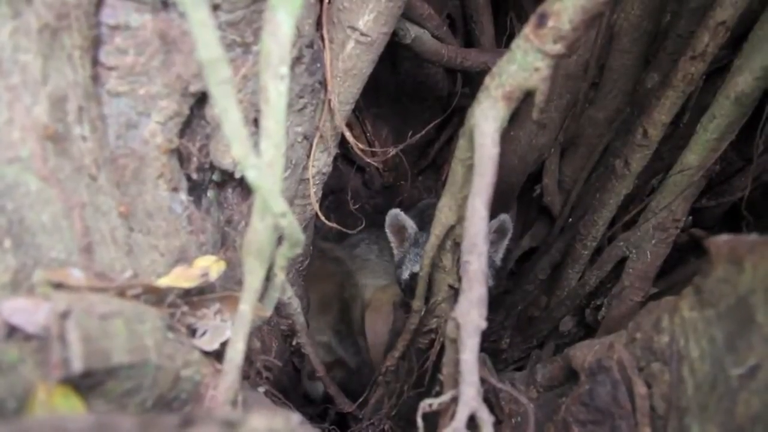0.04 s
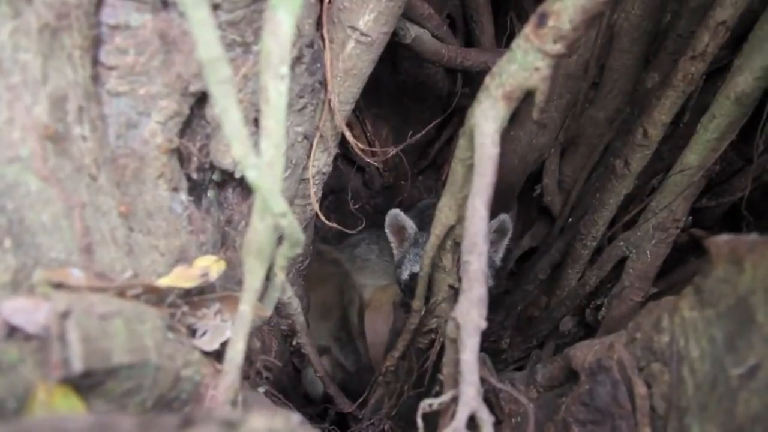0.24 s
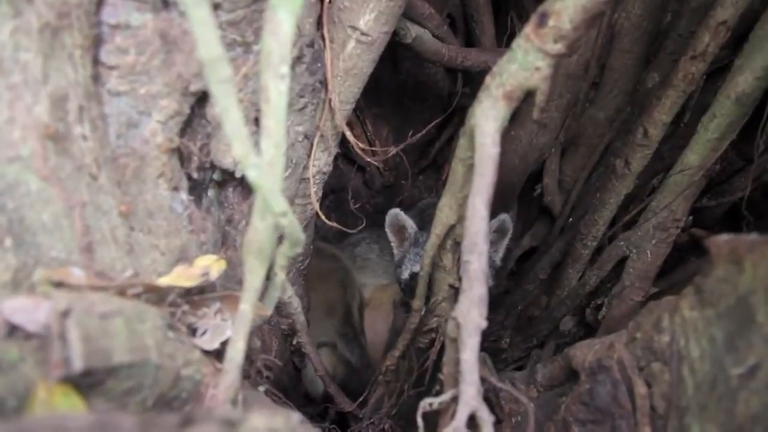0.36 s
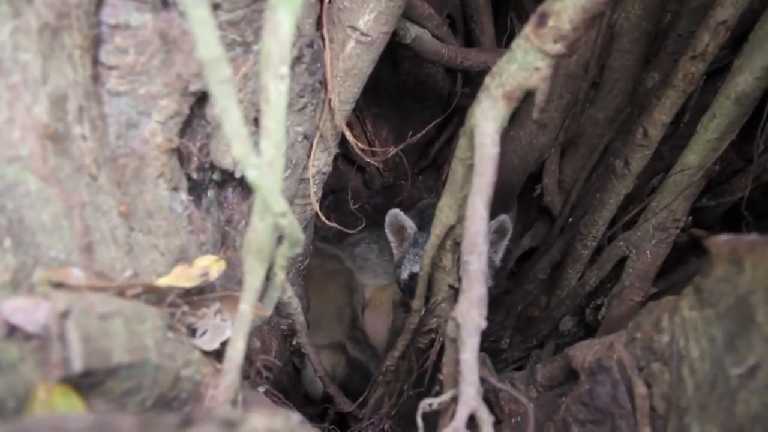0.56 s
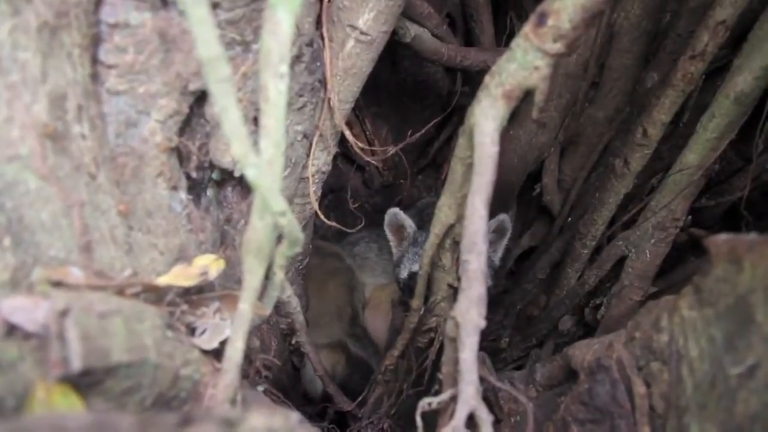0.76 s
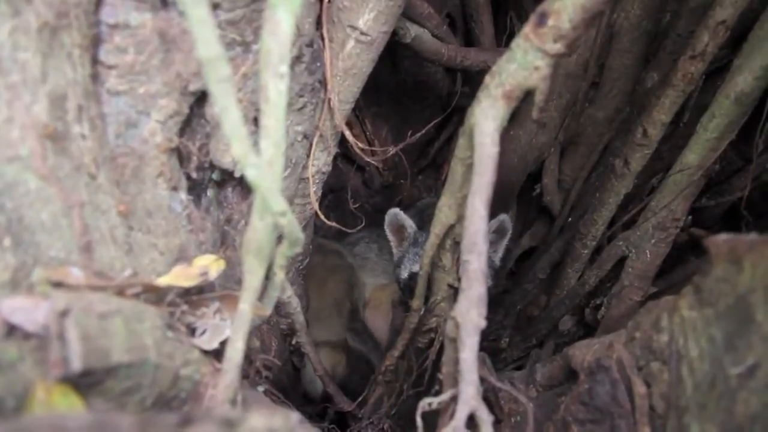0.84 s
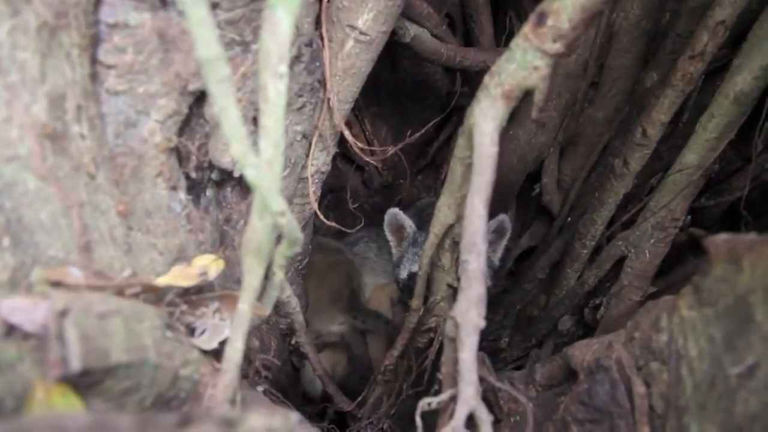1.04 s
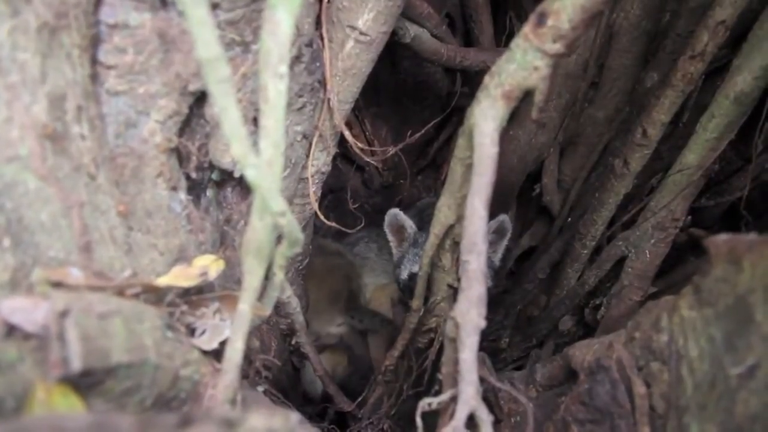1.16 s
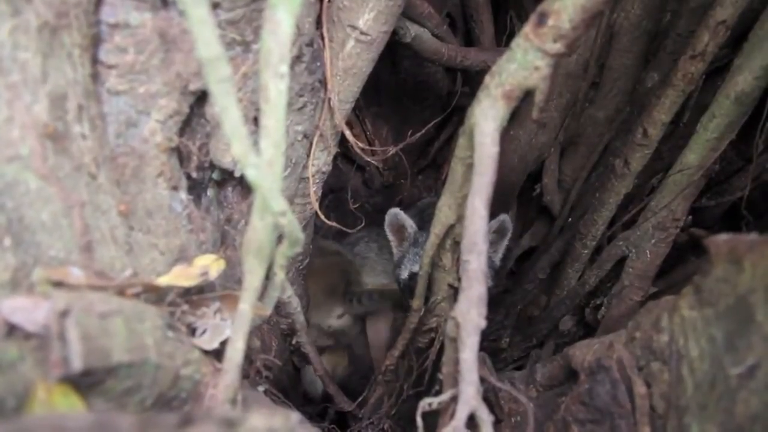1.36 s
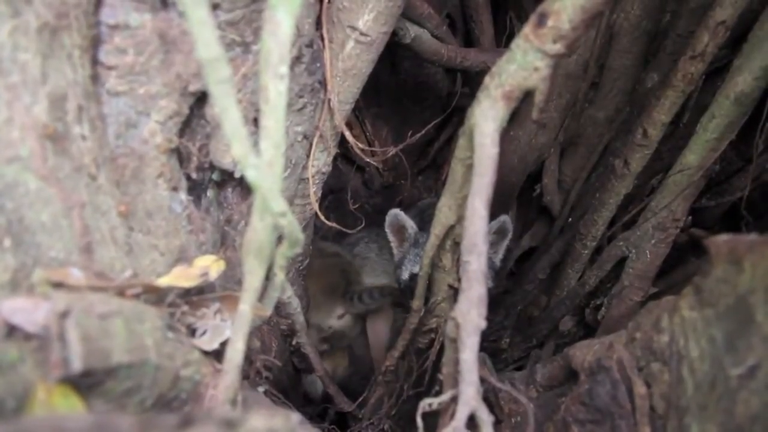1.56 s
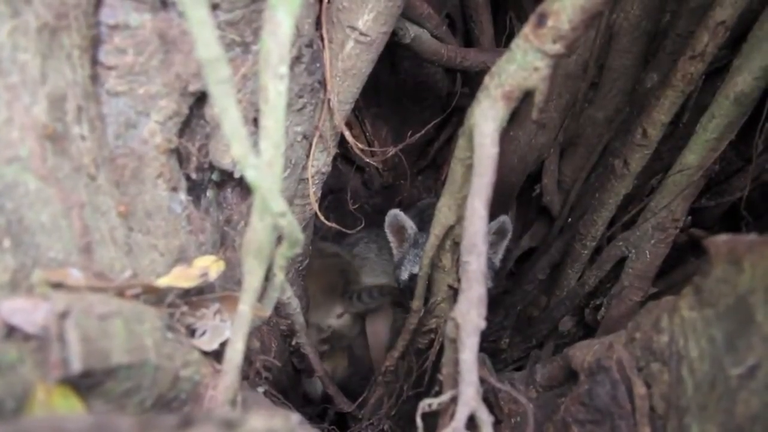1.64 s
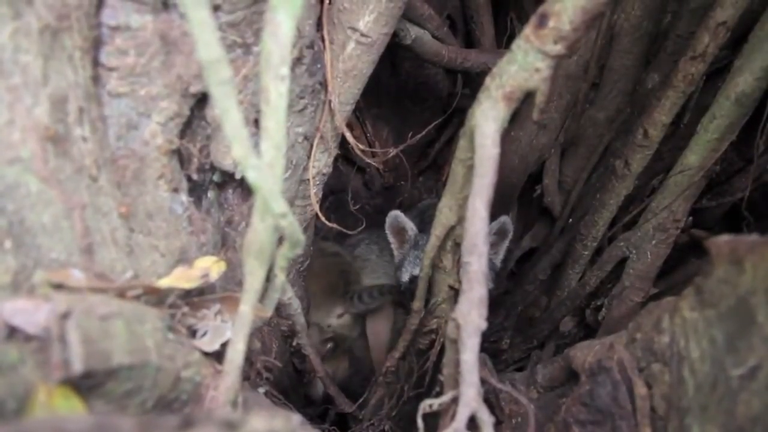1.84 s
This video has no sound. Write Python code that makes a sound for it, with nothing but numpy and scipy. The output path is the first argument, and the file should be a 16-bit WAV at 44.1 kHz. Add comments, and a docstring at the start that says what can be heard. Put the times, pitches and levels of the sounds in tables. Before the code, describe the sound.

A raccoon wails, cracks into a rasping snarl, then hisses twice from its den.

```python
"""Insects shrill in a forest. From a den among tree roots a raccoon wails: one long, thin, gliding
cry, harmonics shaped by throat and mouth. It shifts, bumping wood and ticking dry litter. The cry
swells and cracks into a rasping snarl (the voice drops to a half or a third of its pitch).
The whole scene fades to a brief silence. Two breathy hisses follow, the forest now fainter."""
import sys
import numpy as np
from scipy import signal
from scipy.fft import rfft, irfft
from scipy.io import wavfile

SR = 44100
rng = np.random.default_rng(int(sys.argv[2]) if len(sys.argv) > 2 else 0)


def dump_mix(stems):
    """Bounce the given channels to the path in sys.argv[1] as a 16-bit WAV at rate SR."""
    frames = np.atleast_2d(stems).T  # one column per channel
    limited = np.clip(frames, -1, 1)  # hard clip at full scale
    pcm = np.round(limited * 32767).astype(np.int16)
    wavfile.write(sys.argv[1], SR, pcm)


N = 83790
TIME = np.arange(N) / SR

# voice cracks: start/s, end/s, cycles per pattern, undertones/dB, growl/dB, rasp/dB
CRACKS = [(.145, .215, 2, -53, -62, -54), (.885, .918, 3, -36, -36.5, -52), (.918, .962, 3, -36, -50, -40),
          (.962, .996, 3, -27, -33.5, -37), (.996, 1.012, 3, -32, -35, -37),
          (1.033, 1.056, 3, -36, -41, -39.5), (1.056, 1.11, 2, -34, -49, -48),
          (1.11, 1.16, 3, -38, -47, -45), (1.16, 1.212, 2, -41, -57, -52), (1.212, 1.24, 3, -37, -42, -46),
          (1.24, 1.298, 2, -38.5, -53, -55), (1.298, 1.329, 3, -39, -42, -44)]
# spectrum of breath and ticks: f/Hz, level/dB
AIR_SPECTRUM = [(300, -15), (1200, -1), (3000, -0.5), (8000, -5.5), (10500, -2.5), (15500, -11.5)]
SHIMMER_RATE_HZ, WANDER_RATE_HZ = 38, 70
SILENT_FROM_S, SILENT_TO_S = 1.458, 1.6157


def from_db(db):
    """Decibels to gain."""
    return 10 ** (np.asarray(db) / 20)


def unit_rms(x):
    """Scale to rms 1."""
    return x / np.sqrt(np.mean(x ** 2) + 1e-20)


def curves(rows):
    """One piecewise-linear curve per column after t/s."""
    times_s, *columns = np.transpose(rows)
    return [np.interp(TIME, times_s, column) for column in columns]


def gain_at(spectrum, hz):
    """Gain of a spectrum table, interpolated over log frequency."""
    points_hz, db = np.transpose(spectrum)
    return from_db(np.interp(np.log(hz + 1e-9), np.log(points_hz), db))


def noise(spectrum, pulsing=1):
    """Steady or pulsing shaped noise, rms 1."""
    white = pulsing * rng.standard_normal(N)
    bins_hz = np.arange(N // 2 + 1) * SR / N
    return unit_rms(irfft(rfft(white) * gain_at(spectrum, bins_hz), N))


def drift(rate_hz):
    """Low-passed random motion, rms 1."""
    pole = np.exp(-2 * np.pi * rate_hz / SR)
    return unit_rms(signal.lfilter([1], [1, -2 * pole, pole * pole], rng.standard_normal(2 * N))[N:])


def gate(start_s, end_s, ramp_s=0.0059):
    """1 between two times, ramped edges."""
    return np.clip(.5 + (TIME - start_s) / ramp_s, 0, 1) * np.clip(.5 + (end_s - TIME) / ramp_s, 0, 1)


def partials(multiples, pitch_hz, phase, shape, shimmer_db, wander_rad=0):
    """Shimmering voice partials weighted by shape(hz), rms held near 1."""
    out, power = 0, 0
    for k in multiples:
        gain = shape(k * pitch_hz)
        offset_rad = 1.4 * rng.standard_normal()
        if wander_rad:
            offset_rad += wander_rad * drift(WANDER_RATE_HZ)
        shimmer = from_db(shimmer_db * drift(SHIMMER_RATE_HZ))
        out += gain * shimmer * np.cos(k * phase + offset_rad)
        power += gain ** 2 / 2
    return out / np.sqrt(power)


def forest(insect_hz=6232, width_hz=693):
    """Narrow-band insect shrill over soft forest air, both fainter after the silence."""
    # forest air: f/Hz, level/dB
    air_spectrum = [(25, -28.5), (60, -7), (270, 4.5), (450, -2.5), (1000, 0.5), (5000, -16), (12500, -16),
                    (15500, -27.5)]
    edges_hz = [insect_hz - width_hz / 2, insect_hz + width_hz / 2]
    band = signal.butter(3, edges_hz, "band", fs=SR, output="sos")
    insects = unit_rms(signal.sosfilt(band, rng.standard_normal(N)))
    insect_db = np.where(TIME > SILENT_TO_S, -61, -47.5)
    air_db = np.where(TIME > SILENT_TO_S, -71, -55.5)
    return from_db(insect_db) * insects + from_db(air_db) * noise(air_spectrum)


def wail(jitter=0.0028, crack_jitter=0.0077, shimmer_db=1.5):
    """Gliding harmonics through throat and mouth, plus snarl and breath."""
    # t/s, f/Hz
    pitch_glide = [(0, 902), (.04, 912.7), (.14, 1056), (.205, 1043), (.237, 1155), (.388, 1102),
                   (.41, 1058), (.46, 1044), (.5, 993), (.6, 961.7), (.77, 888), (.81, 891.5), (.86, 950),
                   (.885, 936.2), (.94, 987), (.97, 947), (1.007, 931.3), (1.016, 1020), (1.035, 1014),
                   (1.06, 939.4), (1.1, 921), (1.19, 884.3), (1.225, 901), (1.245, 877), (1.295, 885),
                   (1.33, 837)]
    # t/s, level/dB
    fundamental_level = [(0, -45), (.035, -52.5), (.15, -42), (.215, -44.5), (.235, -33), (.27, -38),
                         (.3, -36), (.39, -41), (.53, -51), (.7, -54), (.9, -47), (1.16, -49.5),
                         (1.18, -47.5), (1.32, -43.5), (1.34, -79)]
    # vocal effort: t/s, overtone level/dB, mouth resonance/Hz
    effort = [(0.0, -48, 1950), (0.053, -50, 2130), (0.098, -42.0, 1700), (0.139, -50.5, 2700),
              (0.162, -40.5, 2300), (0.202, -42.5, 2315), (0.218, -52, 2500), (0.239, -35.0, 1800),
              (0.292, -46.5, 1360), (0.395, -48.5, 2620), (0.417, -39.0, 2480), (0.461, -39, 2320),
              (0.472, -39.0, 1580), (0.52, -39.5, 1670), (0.541, -35.5, 1900), (0.603, -33.5, 1910),
              (0.666, -34.5, 2240), (0.734, -42, 2267), (0.758, -40.5, 2185), (0.799, -46.5, 2100),
              (0.813, -38.5, 2254), (0.864, -28.5, 2107), (0.931, -24.5, 1960), (0.936, -32.5, 1929),
              (0.952, -20.5, 2060), (0.979, -29, 2030), (1.007, -30.5, 2500), (1.03, -31, 4500),
              (1.065, -34, 3710), (1.091, -29.5, 3680), (1.123, -33, 3175), (1.148, -35.0, 2756),
              (1.166, -30, 2998), (1.179, -42, 3194), (1.203, -31.5, 2780), (1.233, -39.5, 2948),
              (1.242, -33, 3180), (1.301, -38.5, 3110), (1.33, -49, 2134), (1.347, -77, 1875)]
    # throat response: f/Hz, level/dB
    throat_spectrum = [(1900, 0), (2900, -3), (3800, -4), (4700, -10), (5400, -11), (7700, -16),
                       (8600, -11), (9250, 0), (10200, -13), (14000, -25)]
    # air through the mouth: t/s, level/dB
    breath_level = [(0, -60.5), (.2, -58), (.3, -58.5), (.52, -58), (.57, -47.5), (.66, -54), (.81, -53.5),
                    (.99, -40.5), (1.09, -41), (1.32, -59), (1.45, -59.5)]
    pitch_hz, = curves(pitch_glide)
    fundamental_db, = curves(fundamental_level)
    overtone_db, mouth_hz = curves(effort)
    breath_db, = curves(breath_level)
    roughness = sum(gate(start_s, end_s) * from_db(rasp_db) for start_s, end_s, *_, rasp_db in CRACKS)
    pitch_hz *= 1 + (jitter + crack_jitter * roughness / roughness.max()) * drift(rate_hz=86)
    phase = 2 * np.pi * np.cumsum(pitch_hz) / SR

    def mouth(hz, q=4.5, leak=.07):
        """One moving resonance, steep below its peak, gentle above."""
        ratio = hz / mouth_hz
        return leak + ratio * np.minimum(ratio, 1) / np.hypot(1 - ratio ** 2, ratio / q)

    def tract(hz):
        """Throat and mouth in series; the shrill top weakens as the cry starts to swell."""
        top_db = -7 * (hz > 7700) * (1 - gate(0, .745))
        return gain_at(throat_spectrum, hz) * from_db(top_db) * mouth(hz)

    voice = from_db(fundamental_db + shimmer_db * drift(SHIMMER_RATE_HZ)) * np.sqrt(2) * np.cos(phase)
    voice += from_db(overtone_db) * partials(range(2, 16), pitch_hz, phase, tract, shimmer_db)
    flare = from_db(-30.5) * np.exp(-((TIME - 1.052) / 0.016) ** 2)
    voice += flare * np.sqrt(2) * np.cos(2 * phase)  # second harmonic, as the pitch falls
    return voice + snarl(pitch_hz, phase, mouth) + from_db(breath_db) * noise(AIR_SPECTRUM)


def snarl(pitch_hz, phase, mouth, wander_rad=0.55, mouth_share=0.39):
    """The cracked voice repeats every 2 or 3 cycles: undertones, low growl, pulsing rasp."""
    # f/Hz, level/dB
    undertone_spectrum = [(640, -22), (1250, -6.5), (1500, 7), (2250, -1.5), (2550, -9), (3150, 4),
                          (3500, -1), (4300, -10), (9400, -20), (14000, -28)]
    # f/Hz, level/dB
    rasp_spectrum = [(60, -37), (270, 0), (450, -8.5), (1100, -10.5), (1900, -3), (3300, -4.5), (4500, -14),
                     (6200, -5.5), (7800, -23.5), (9600, -9.5), (14000, -32)]

    def shape(hz):
        """Undertone gain, partly following the mouth."""
        return gain_at(undertone_spectrum, hz) * mouth(hz) ** mouth_share

    out = 0
    for cycles in (2, 3):
        between_harmonics = [m / cycles for m in range(2, 14 * cycles) if m % cycles]
        undertones = partials(between_harmonics, pitch_hz, phase, shape,
                              shimmer_db=4, wander_rad=wander_rad)
        growl = np.sqrt(2) * np.cos(phase / cycles + wander_rad * drift(WANDER_RATE_HZ))
        rasp = noise(rasp_spectrum, pulsing=1 + np.cos(phase / cycles))
        for start_s, end_s, crack_cycles, under_db, growl_db, rasp_db in CRACKS:
            if crack_cycles == cycles:
                mix = from_db(under_db) * undertones + from_db(growl_db) * growl + from_db(rasp_db) * rasp
                out += gate(start_s, end_s) * mix
    return out


def den(x, t60_s=0.17, wet_db=-15):
    """Add the short, dense ring of the hollow."""
    age_s = TIME[:SR // 4]
    tail = rng.standard_normal(len(age_s)) * from_db(-60 * age_s / t60_s)
    return x + from_db(wet_db) * signal.fftconvolve(x, tail / np.linalg.norm(tail))[:N]


def shuffling(bump_width_s=0.0043, tick_decay_s=.006):
    """The animal shifts: dull bumps on wood, ticks of dry litter."""
    # t/s, level/dB, f/Hz
    bumps = [(.258, -41.5, 275), (0.307, -44, 182), (1.125, -37, 190), (1.351, -34, 210)]
    # t/s, level/dB
    ticks = [(0.185, -50), (.255, -46), (.352, -46.5), (1.654, -38.5), (1.87, -43.5)]
    wood, tick_envelope = 0, 0
    for at_s, db, hz in bumps:
        age_s = TIME - at_s
        wood += from_db(db) * np.exp(-(age_s / bump_width_s) ** 2) * np.sin(2 * np.pi * hz * age_s)
    for at_s, db in ticks:
        tick_envelope += from_db(db) * (TIME >= at_s) * np.exp(-np.abs(TIME - at_s) / tick_decay_s)
    return wood + tick_envelope * noise(AIR_SPECTRUM)


def hisses(mouth_q=4.6, resonance_db=10.5, flutter_db=0.65):
    """Overlapping voiceless puffs, each with one resonance of the open mouth."""
    # peak t/s, level/dB, rise/s, fall/s, resonance/Hz
    puffs = [(1.631, -43.5, 0.025, 0.058, 2780), (1.715, -36.5, 0.037, 0.05, 1575),
             (1.811, -52, 0.038, 0.16, 1514), (1.9, -38.5, .018, 0.09, 1344)]
    # f/Hz, level/dB
    hiss_spectrum = [(100, -15.5), (400, -11), (600, -1), (850, -7), (1200, 4.5), (1800, -2.5), (2800, 4),
                     (3700, -2), (12000, -14), (15500, -17)]
    out = 0
    for peak_s, db, rise_s, fall_s, mouth_hz in puffs:
        air = noise(hiss_spectrum)
        air += from_db(resonance_db) * signal.lfilter(*signal.iirpeak(mouth_hz, mouth_q, fs=SR), air)
        envelope = np.exp(-np.maximum((peak_s - TIME) / rise_s, (TIME - peak_s) / fall_s))
        out += from_db(db) * envelope * unit_rms(air)
    return out * from_db(flutter_db * drift(rate_hz=110))


def scene():
    """Raccoon in its den, forest behind, all centred."""
    mono = den(wail() + hisses() + shuffling()) + forest()
    return np.array([mono, mono])


def record(dry, fade_out_s=0.08, fade_in_s=0.067, stopband_hz=16100):
    """Fade to a brief silence and back, then low-pass."""
    fade_out = np.clip((SILENT_FROM_S - TIME) / fade_out_s, 0, 1)
    fade_in = np.clip((TIME - SILENT_TO_S) / fade_in_s, 0, 1)
    lowpass = signal.cheby2(16, 60, stopband_hz, fs=SR, output="sos")
    return signal.sosfiltfilt(lowpass, dry * (fade_out + fade_in))


dry = scene()
out = record(dry)
dump_mix(out)
```